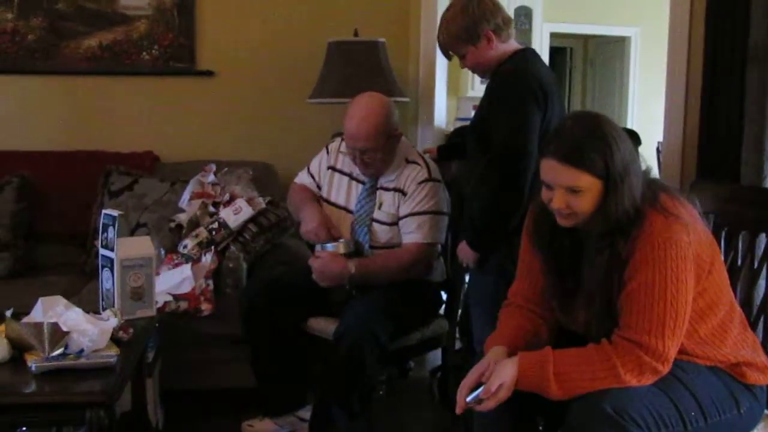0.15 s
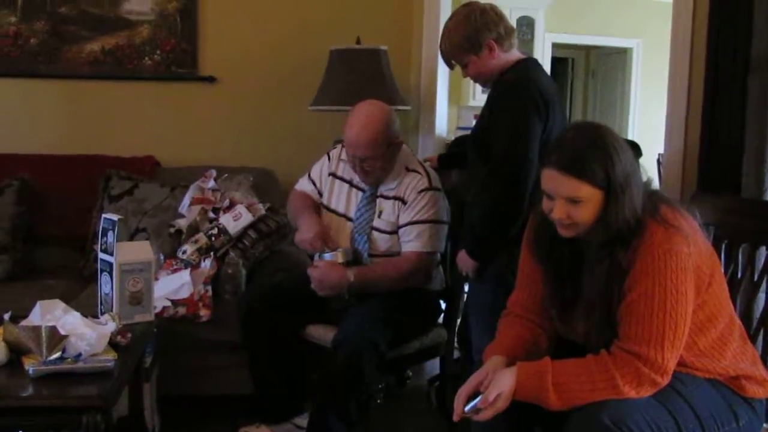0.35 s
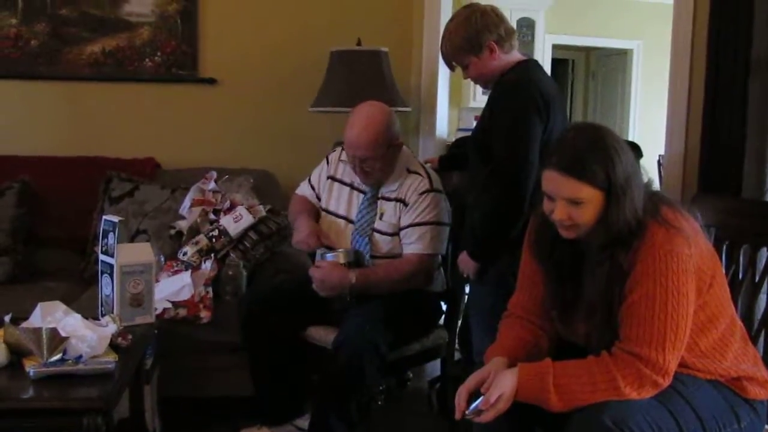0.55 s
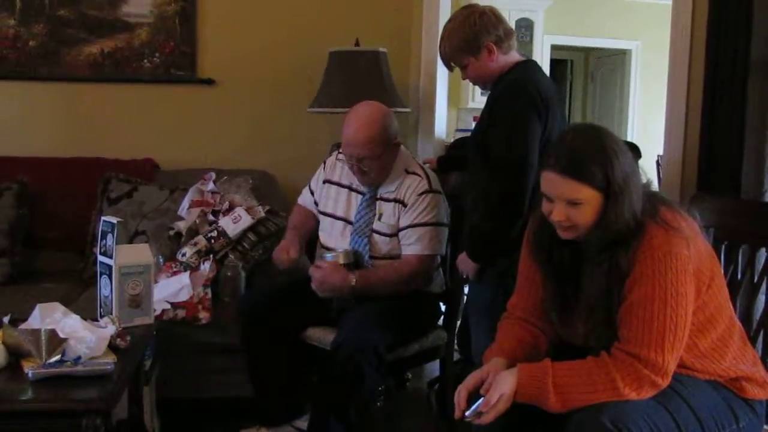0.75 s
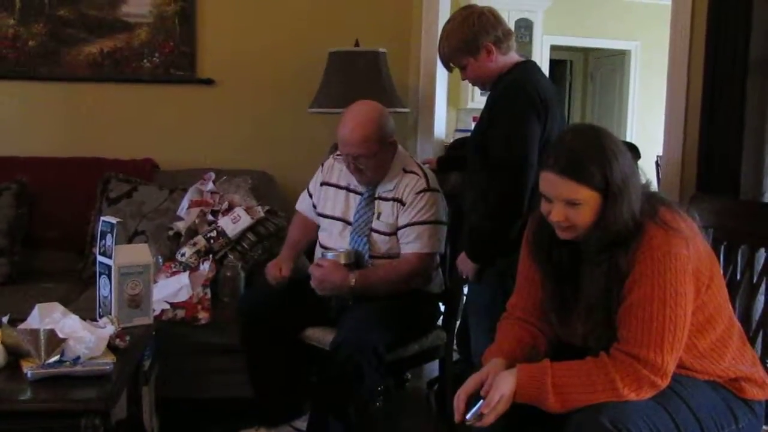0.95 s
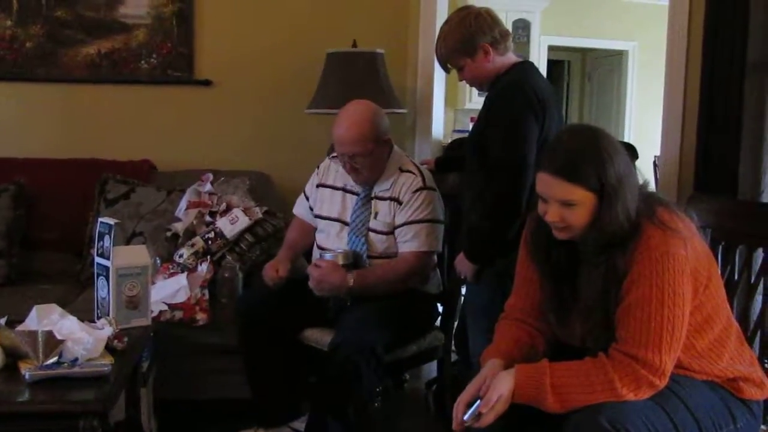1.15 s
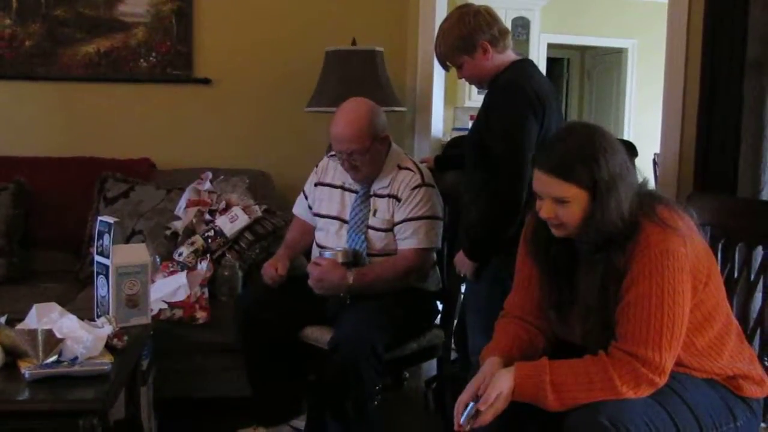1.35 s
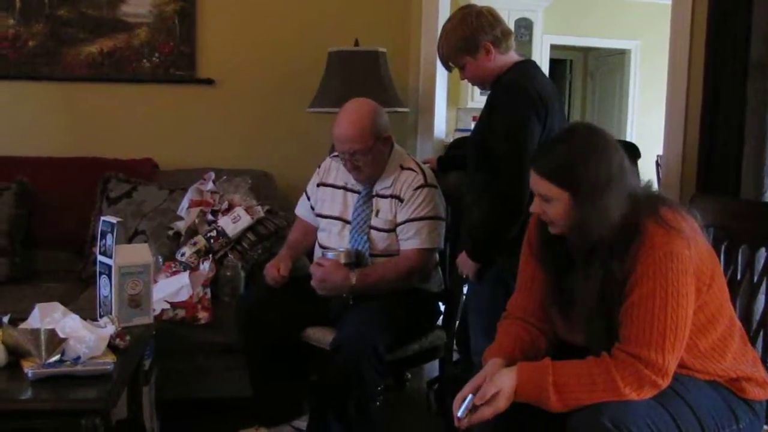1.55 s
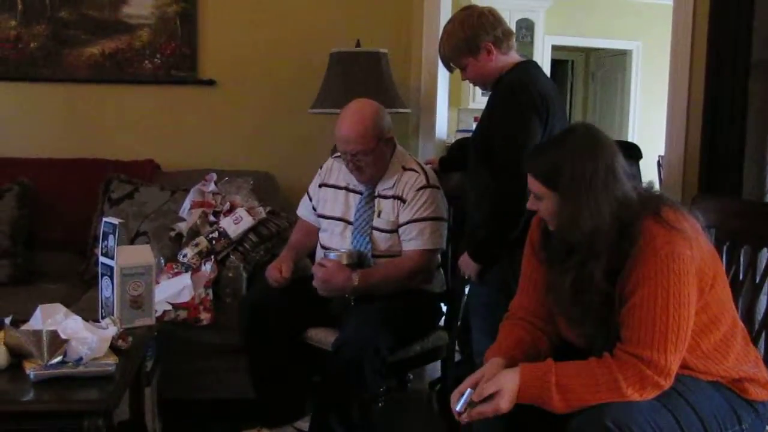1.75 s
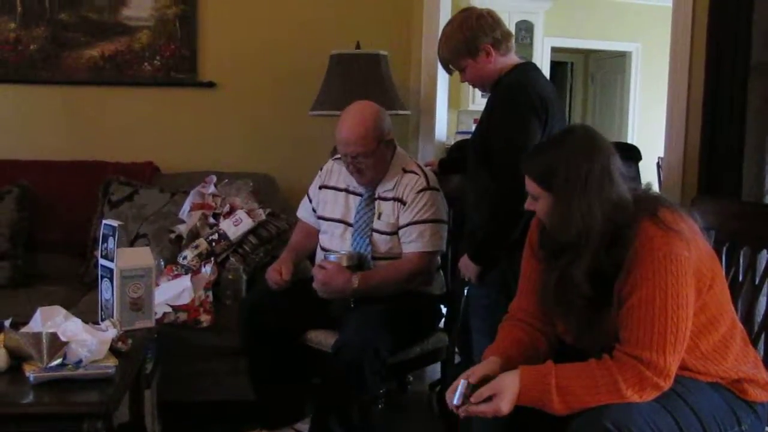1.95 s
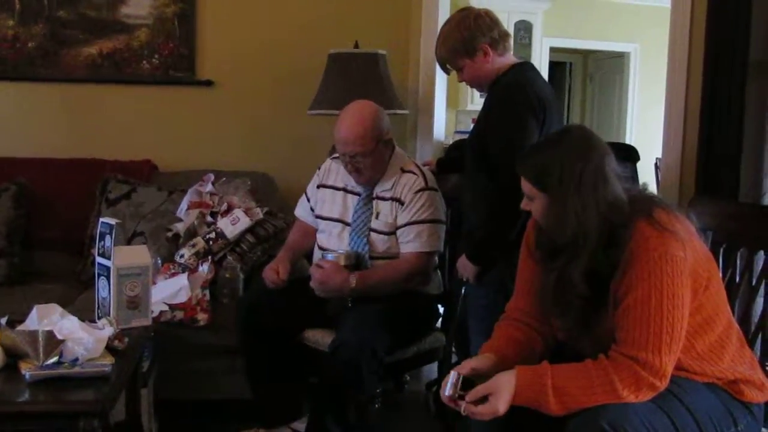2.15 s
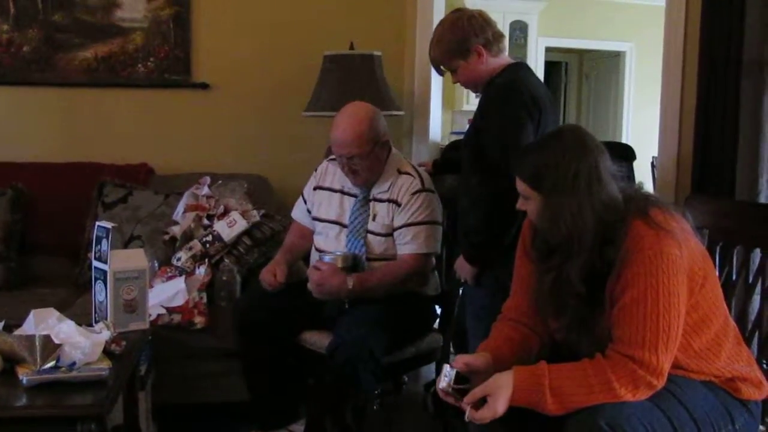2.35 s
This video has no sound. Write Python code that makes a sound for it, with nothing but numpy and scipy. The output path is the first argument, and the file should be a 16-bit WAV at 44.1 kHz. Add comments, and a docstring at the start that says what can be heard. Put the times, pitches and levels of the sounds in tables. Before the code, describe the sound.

A coin scrapes through the slot of a small metal bank, lands with a loud, hollow clank, bounces and rattles to rest, then faint ticks and cloth rustle in a quiet living room, miked fairly close in stereo.

```python
"""A sleeve brush, cloth rustle and light knocks come first, then a coin scrapes through a metal bank's slot.
The coin drops, bounces on the bottom and rattles to rest; a bright tick, a flick and brushes follow.
Contacts are filtered noise bursts and decaying sines; a low-tuned hollow body thumps and a living room answers.
Behind them lie filtered-noise air, a low hum from resonators and a thin, pulsing electrical whine."""
import sys
import numpy as np
from scipy import signal
from scipy.fft import rfft, irfft, next_fast_len
from scipy.io import wavfile

SR = 44100
rng = np.random.default_rng(int(sys.argv[2]) if len(sys.argv) > 2 else 0)


def inscribe(sig):
    """Save sig as 16-bit PCM at rate SR to the path in sys.argv[1].

    A 1-D sig is mono; a 2-D sig holds one channel per row.
    Samples are clipped to [-1, 1] before scaling.
    """
    pcm = np.round(np.clip(np.atleast_2d(sig).T, -1, 1) * 32767)
    wavfile.write(sys.argv[1], SR, pcm.astype(np.int16))


N = 105840
T = np.arange(N) / SR  # seconds

# The hollow body of the bank. Each row: frequency in Hz, level in dB, decay time t60 in s.
BODY_MODES = [(188.2, -23.5, 0.47), (245, -20.5, 0.2), (250.8, -8, 0.095), (270.3, -22.5, 0.4),
              (294, -42, 0.257), (284, -23.5, 0.058), (370, -43, 0.4)]
# The thump arriving directly and off the walls. Each row: delay in s, level in dB.
THUMP_PATHS = [(.0006, -12.5), (.0107, -2.5), (.0393, -13.5), (.0515, -15)]
BODY_LOW_CUT_HZ = 199


def body_thump():
    """The hollow body rings low under a blow and is heard over several paths."""
    low_cut = signal.butter(3, BODY_LOW_CUT_HZ, "high", fs=SR, output="sos")
    body = signal.sosfilt(low_cut, ringing(BODY_MODES, T, spread_db=2))
    return sum(from_db(db) * delayed(body, s) for s, db in THUMP_PATHS)


# The thin bottom plate. Each row: frequency in Hz, level in dB, decay time t60 in s.
PLATE_MODES = [(424, -31, 0.15), (509, -31, 0.36), (551, -33, 0.22), (577, -29, 0.24), (636, -30, 0.22),
               (718, -29, 0.27), (766, -28.5, .3), (881, -31.5, 0.37), (918, -33, 0.47)]
PLATE_BUILD_S = 0.0024


def plate_ring():
    """The bottom plate's tinny modes build up briefly, then die away."""
    t = T[:SR // 2]
    return ringing(PLATE_MODES, t, spread_db=0.5) * (1 - np.exp(-t / PLATE_BUILD_S))


# The coin lands and bounces. Each row: start in s, clink level in dB, brightness in dB per octave,
# thump level in dB, tinny plate level in dB, direct sound in dB.
BOUNCES = [(0.3051, -1, -.5, 2.5, -4, 4), (0.371, -17, 3.5, -25, -13, 1), (0.3825, -8, -2, -28, -9.5, 1.5),
           (0.4473, -6.5, 0, -3.5, 2, -0.5), (.510, -6.5, -1.5, -7.5, -2.5, -2),
           (.571, -12.5, 0, -20.5, -10.5, -2), (.654, -16, -1.5, -20, -22, -3.5),
           (.661, -15, 0, -19, -12, -2.5), (.677, -14.5, -2.5, -16, -28, -1),
           (0.685, -19.5, 1, -33, -23, -1.5), (0.7111, -18.5, -2.5, -15, -22, -5),
           (0.734, -20.5, -2, -26.5, -30, -6), (.756, -16, 0, -23.5, -26, -3.5),
           (0.7622, -22, -1.5, -18, -34, -4), (.797, -22, -2.5, -28.5, -28, -3),
           (.835, -27, -1, -30, -44, -10)]
# Colour of the bank's clink. Each row: frequency in Hz, level in dB.
BANK_TONE = [(50, -4), (120, -10), (200, 26), (300, 26), (420, 9.5), (700, 17), (1300, 20), (2000, 20.5),
             (3100, 14.5), (4300, 2.5), (6200, -1), (8500, -11.5), (11000, -16.5), (15500, -41)]
# Clear ringing of the bank. Each row: frequency in Hz, level in dB, decay time t60 in s.
BANK_MODES = [(1074, -33.5, 0.9), (1208, -30, 0.42), (1298, -43, 0.3), (1307, -33, 0.54),
              (1383, -36, 0.088), (1687, -37, 0.55), (1713, -33.5, .44), (2530, -42.5, 1)]
ROLL_START_S, ROLL_PEAK_S, ROLL_END_S = 0.586, 0.678, 0.9
ROLL_DB, ROLL_TOUCHES_PER_S = -22, 60
ROLL_TILT_DB, ROLL_DIRECT_DB = -0.5, 0.5  # tilt in dB per octave


def coin():
    """Bounces clink, ring the bottom plate and set the hollow body thumping; then the coin rolls to rest."""
    thump = body_thump()
    roll_touch = blow(BANK_TONE, BANK_MODES, ROLL_TILT_DB, ROLL_DIRECT_DB)
    roll = touches(ROLL_START_S, ROLL_PEAK_S, ROLL_END_S, ROLL_TOUCHES_PER_S, roll_touch)
    out = from_db(ROLL_DB) * roll
    for s, clink_db, tilt, thump_db, plate_db, direct_db in BOUNCES:
        clink = blow(BANK_TONE, BANK_MODES, tilt, direct_db)
        out += from_db(clink_db) * delayed(clink, s)
        out += from_db(thump_db) * delayed(thump, s)
        out += from_db(plate_db) * delayed(plate_ring(), s)
    return out


# The coin catches in the slot. Each row: start in s, level in dB, brightness in dB per octave.
CATCHES = [(0.1776, -29.5, 3), (.184, -29.5, -6), (.2025, -29, -3), (0.2154, -27, -7), (.219, -12, -3),
           (0.2242, -7.5, -1.5), (0.227, -3.5, 1), (.2332, -7.5, 4.5), (0.24, -9, -5.5)]
# Colour of the slot's contacts. Each row: frequency in Hz, level in dB.
SLOT_TONE = [(100, -19), (250, 8), (450, 7.5), (700, 17), (1100, 17), (1700, 23.5), (2300, 16.5),
             (3400, 15), (5000, 5.5), (7500, -0.5), (10000, -11.5), (15500, -17.5)]
# Clear ringing at the slot. Each row: frequency in Hz, level in dB, decay time t60 in s.
SLOT_MODES = [(1463, -29.5, 0.16), (1647, -21.5, 0.21), (3380, -40, 0.43), (3440, -45.5, 0.21),
              (3758, -38.5, 0.199), (4360, -48, 0.34), (4500, -52, 0.23)]
SLIDE_START_S, SLIDE_PEAK_S, SLIDE_END_S = 0.2044, 0.216, 0.254
SLIDE_DB, SLIPS_PER_S = -23.5, 1200
SLOT_DIRECT_DB = 1.5  # for the catches only


def slot():
    """The coin catches on the edges of the slot as single blows and slides as a dense run of tiny slips."""
    slip = blow(SLOT_TONE, SLOT_MODES)
    slide = touches(SLIDE_START_S, SLIDE_PEAK_S, SLIDE_END_S, SLIPS_PER_S, slip)
    out = from_db(SLIDE_DB) * slide
    for s, db, tilt in CATCHES:
        catch = blow(SLOT_TONE, SLOT_MODES, tilt, SLOT_DIRECT_DB)
        out += from_db(db) * delayed(catch, s)
    return out


# Near surfaces. Each row: delay in s, level in dB.
ECHOES = [(.0072, -6), (.035, -21)]
# The living room's decay. Each row: band centre in Hz, decay time t60 in s.
ROOM_T60 = [(150, 0.35), (500, 0.6), (1500, 0.51), (4000, 0.27), (8000, 0.27), (15000, 0.27)]
# Stereo width of contacts and brushes. Each row: frequency in Hz, side against mid in dB.
WIDTH = [(100, -35), (300, -24.5), (700, -11), (1400, -10.5), (3000, -4.5), (7000, -1.5), (15000, -2.5)]
EDGE_DB, SNAP_DB = -4, -3  # one-sample edge; two-sample bright snap of metal on metal
CRACK_T60_S = 0.026
ROOM_DB, ROOM_BUILD_S = 3, 0.01


def blow(tone, modes=(), tilt_db=0, direct_db=0):
    """One contact: sharp edge and snap, crack of dense modes, clear modes, near echoes and the room's tail."""
    t = T[:SR * 2 // 3]
    near = stereo_noise(WIDTH, len(t)) * dying(t, CRACK_T60_S)
    near[:, 0] -= from_db(EDGE_DB)
    near[:, :2] += from_db(SNAP_DB) * np.array([-1, 1])
    echoes = sum(from_db(db) * delayed(near, s)[:, :len(t)] for s, db in ECHOES)
    heard = from_db(direct_db) * near + echoes + room_tail(t)
    return colour(heard, tone, tilt_db) + ringing(modes, t, spread_db=4)


def room_tail(t):
    """Diffuse reflections build up quickly, then each band of noise decays at its own rate."""
    diffuse = rfft(stereo_noise(WIDTH, len(t)))
    hz = np.arange(len(t) // 2 + 1) * SR / len(t)
    build = 1 - np.exp(-t / ROOM_BUILD_S)
    tail = 0
    for centre, t60 in ROOM_T60:
        # a triangle on the log-frequency axis, one at this centre and zero at the others
        share = at_hz([(f, f == centre) for f, _ in ROOM_T60], hz)
        tail = tail + from_db(ROOM_DB) * irfft(diffuse * share) * dying(t, t60) * build
    return tail


def touches(start, peak, end, per_s, response):
    """A run of small uneven contacts at random instants that swells and fades."""
    happens = rng.random(N) < per_s / SR
    clicks = happens * rng.choice([-1, 1], N) * rng.uniform(0.77, 1, N)
    swell = np.interp(T, [start, peak, end], [0, 1, 0])
    return signal.fftconvolve([clicks * swell], response, axes=1)[:, :N]


def ringing(modes, t, spread_db):
    """Damped sines, each struck with a strength of its own."""
    out = 0
    for hz, db, t60 in modes:
        strength_db = db + spread_db * rng.normal()
        out = out + from_db(strength_db - 60 * t / t60) * np.sin(2 * np.pi * hz * t)
    return out


# Knocks, ticks and a last tiny flick from handling. Each row: start in s, level in dB.
KNOCKS = [(.0618, -24.5), (.071, -22), (.081, -38)]
TICKS = [(1.0958, -22.5), (1.1065, -35), (1.116, -25)]
FLICKS = [(1.146, -35)]
# Their colours. Each row: frequency in Hz, level in dB.
KNOCK_TONE = [(100, 5.5), (400, 22.5), (900, 9.5), (1500, 17.5), (2100, 23.5), (3000, 5.5), (4600, 1.5),
              (7000, -13.5), (15000, -17.5)]
TICK_TONE = [(200, -15), (1300, 8), (2100, 8), (2800, 8.5), (3250, 21), (3800, 19), (4300, 8.5),
             (5100, 11.5), (6000, -1), (9000, -11), (15000, -20)]
FLICK_TONE = [(1000, -3), (4000, 7), (8000, 10), (11500, 2), (15000, -8)]
HANDLING_DIRECT_DB = -0.5


def handling():
    """Dull knocks before the drop, bright ticks and a flick after it, each a blow without clear modes."""
    out = 0
    for rows, tone in ((KNOCKS, KNOCK_TONE), (TICKS, TICK_TONE), (FLICKS, FLICK_TONE)):
        for s, db in rows:
            click = blow(tone, direct_db=HANDLING_DIRECT_DB)
            out = out + from_db(db) * delayed(click, s)
    return out


# Soft brushes of a sleeve. Each row: centre in s, length in s, peak level in dB.
BRUSHES = [(0, 0.12, -47), (1.25, 0.076, -54.5), (2.14, 0.027, -50.5)]
# Colour of the sleeve. Each row: frequency in Hz, level in dB.
BRUSH_TONE = [(150, -9), (450, 3), (800, 2), (1200, -3), (2000, -6), (6000, -41)]


def sleeve():
    """Cloth friction: dull noise under bell-shaped strokes."""
    strokes = sum(from_db(db) * np.exp(-(2 * (T - s) / length) ** 2) for s, length, db in BRUSHES)
    return strokes * rms_one(colour(stereo_noise(WIDTH, N), BRUSH_TONE))


# Level of the rustling clothes. Each row: time in s, level in dB.
RUSTLE_LEVEL = [(0, -52), (.2, -56), (1.02, -63), (1.22, -56), (1.36, -53), (1.48, -52.5), (1.6, -71),
                (1.72, -62), (1.8, -51.5), (1.87, -60.5), (1.97, -54), (2.06, -58.5), (2.3, -53.5),
                (2.4, -59)]
# Colour of the rustle. Each row: frequency in Hz, level in dB.
RUSTLE_TONE = [(200, 16.5), (600, 6), (1200, 8.5), (2500, 6.5), (5000, 1.5), (10000, -7.5), (15000, -21)]
# Stereo width of rustle and room air. Each row: frequency in Hz, side against mid in dB.
AIR_WIDTH = [(30, -11.5), (80, -2), (160, -6), (400, -1.5), (1200, -4), (4000, -0.5), (15000, -1)]


def rustle():
    """Clothes move: coloured noise whose level wanders."""
    level = from_db(np.interp(T, *np.transpose(RUSTLE_LEVEL)))
    return level * rms_one(colour(stereo_noise(AIR_WIDTH, N), RUSTLE_TONE))


# Colour of the room air. Each row: frequency in Hz, level in dB.
AIR_TONE = [(25, 0.5), (60, -0.5), (100, -1), (150, -3), (280, -6.5), (420, -14), (700, -10.5), (1100, -10),
            (2000, -19), (4000, -23.5), (8000, -28.5), (14000, -34.5), (16000, -46)]
AIR_DB = -52.5


def room_air():
    """The room's broad background, noise strongest in the bass."""
    return from_db(AIR_DB) * rms_one(colour(stereo_noise(AIR_WIDTH, N), AIR_TONE))


# Low room resonances. Each row: frequency in Hz, width in Hz, level at mid-length in dB, swell in dB per s.
HUMS = [(185, 16, -59, -0.5), (265.5, 16, -59.5, 1.5), (303, 83, -63, 7)]


def room_hum():
    """Low resonances of the room: noise through narrow peaks, each slowly rising or falling."""
    hum = 0
    for hz, width, db, swell in HUMS:
        b, a = signal.iirpeak(hz, hz / width, fs=SR)
        tone = rms_one(signal.lfilter(b, a, rng.standard_normal(N)))
        hum = hum + from_db(db + swell * (T - T.mean())) * tone
    return hum


WHINE_HZ, WHINE_DB = 15735, -59.5
WHINE_PULSES_PER_S, WHINE_PULSE_DEPTH = 13, 0.23


def whine():
    """A thin electrical tone that pulses slightly, its phase one radian apart between channels."""
    pulse = 1 + WHINE_PULSE_DEPTH * np.sin(2 * np.pi * WHINE_PULSES_PER_S * T)
    tone = np.sin(2 * np.pi * WHINE_HZ * T + np.array([[0], [1]]))
    return from_db(WHINE_DB) * rms_one(pulse * tone)


def from_db(db):
    """Decibels to gain."""
    return 10 ** (np.asarray(db) / 20)


def rms_one(x):
    """Scale to unit rms."""
    return x / np.sqrt(np.mean(x ** 2) + 1e-20)


def at_hz(points, hz):
    """Read a table on a log-frequency axis."""
    f, value = np.transpose(points)
    return np.interp(np.log(np.maximum(hz, 1)), np.log(f), value)


def colour(x, tone, tilt_db=0):
    """Causal minimum-phase filter with the given spectrum, tilted about 2 kHz."""
    size = next_fast_len(x.shape[-1] // 2 + 2048, real=True) * 2
    hz = np.arange(size // 2 + 1) * SR / size
    octaves = np.log2(np.maximum(hz, 500) / 2000)  # the tilt is level below 500 Hz
    cepstrum = irfft(np.log(from_db(at_hz(tone, hz) + tilt_db * octaves)))
    # folding the cepstrum forward in time makes the filter causal
    cepstrum[1:size // 2] *= 2
    cepstrum[size // 2 + 1:] = 0
    response = np.exp(rfft(cepstrum))
    return irfft(rfft(x, size) * response)[..., :x.shape[-1]]


def stereo_noise(width, size):
    """White noise whose two sides differ as the width table says."""
    mid, side = rng.standard_normal((2, size))
    return mid + colour(side, width) * np.array([[1], [-1]])


def delayed(x, s):
    """The sound s seconds later, at full length."""
    start = int(max(s, 0) * SR)
    out = np.zeros(x.shape[:-1] + (N,))
    part = x[..., :N - start]
    out[..., start:start + part.shape[-1]] = part
    return out


def dying(t, t60):
    """Exponential decay of unit energy."""
    return from_db(-60 * t / t60) * np.sqrt(2 * np.log(1000) / (t60 * SR))


# Balance of the two channels. Each row: frequency in Hz, left against right in dB.
LEAN = [(200, 1), (700, 0.5), (1300, 1), (2400, -1.8), (4400, 1.8), (15000, -1.7)]


def scene():
    """Everything together, each channel with a slightly different colour except for the whine."""
    left, right = coin() + slot() + handling() + sleeve() + rustle() + room_air() + room_hum()
    left = colour(left, [(hz, db / 2) for hz, db in LEAN])
    right = colour(right, [(hz, -db / 2) for hz, db in LEAN])
    return np.array([left, right]) + whine()


TOP_CUT_HZ = 16100


def record(dry):
    """Peaks beyond full scale overload and clip; a steep filter then cuts the top."""
    top_cut = signal.ellip(10, .1, 70, TOP_CUT_HZ, fs=SR, output="sos")
    return signal.sosfilt(top_cut, np.clip(dry, -1, 1))


dry = scene()
out = record(dry)
inscribe(out)
```